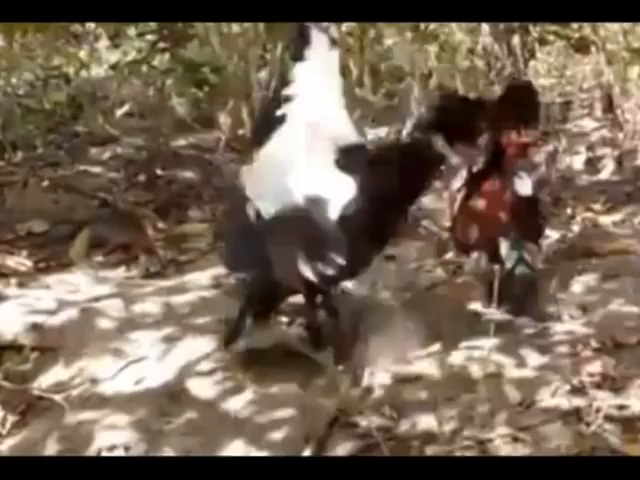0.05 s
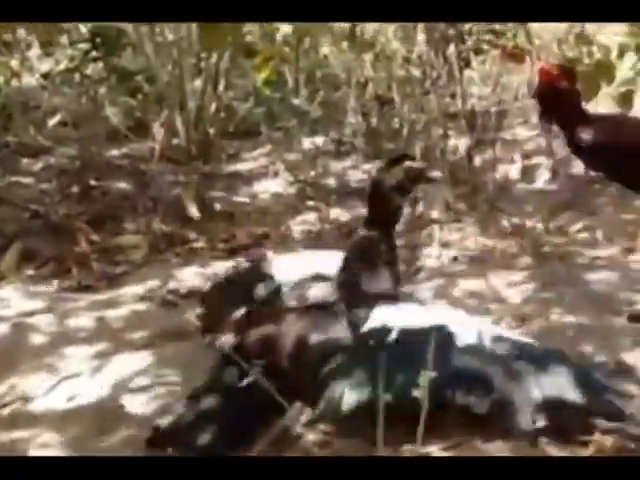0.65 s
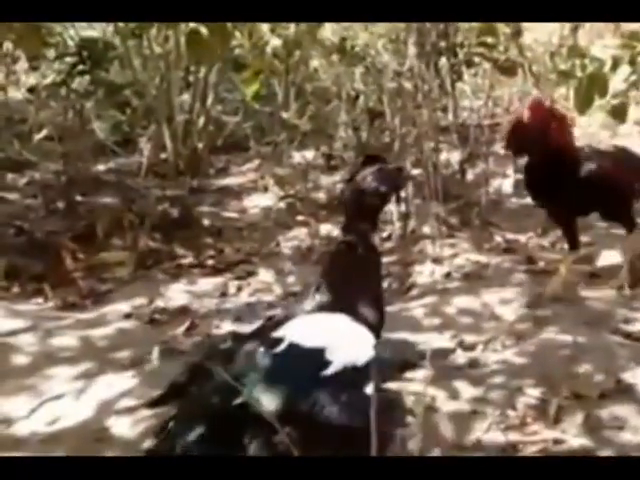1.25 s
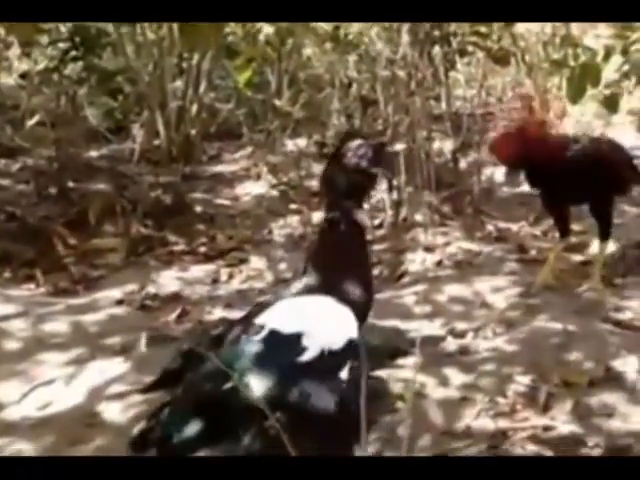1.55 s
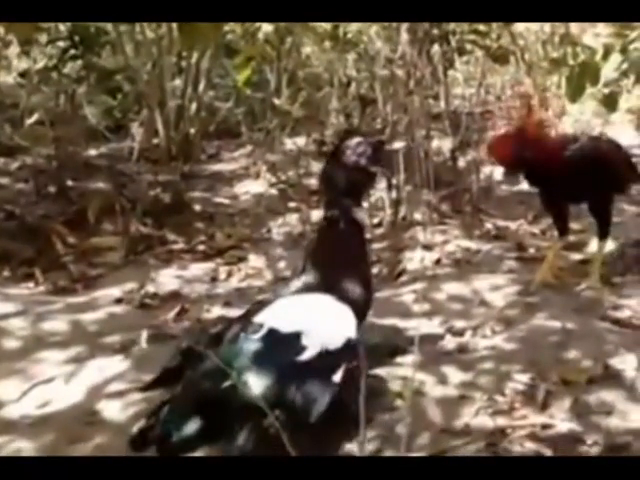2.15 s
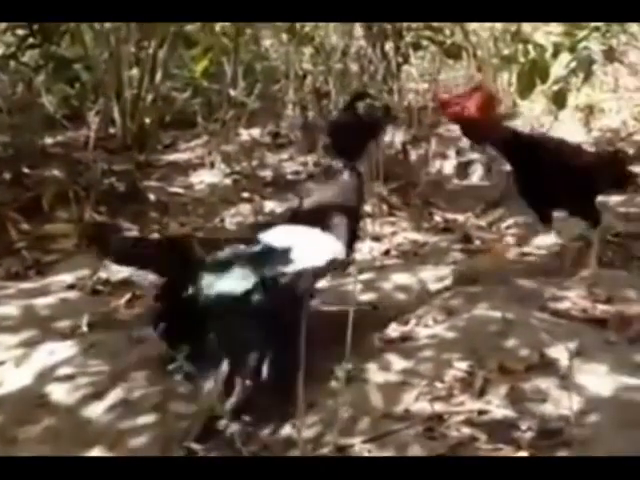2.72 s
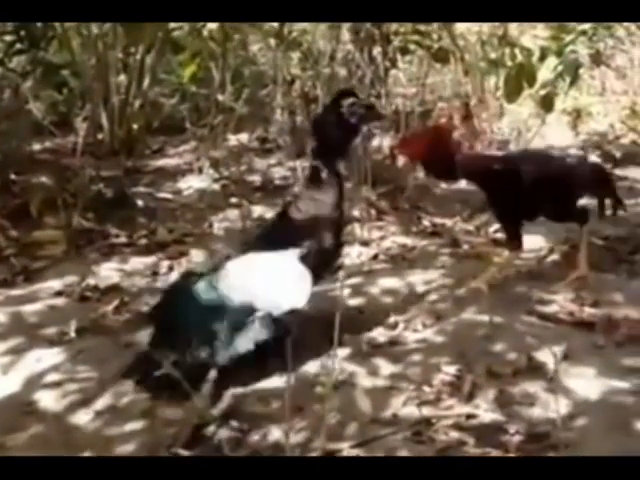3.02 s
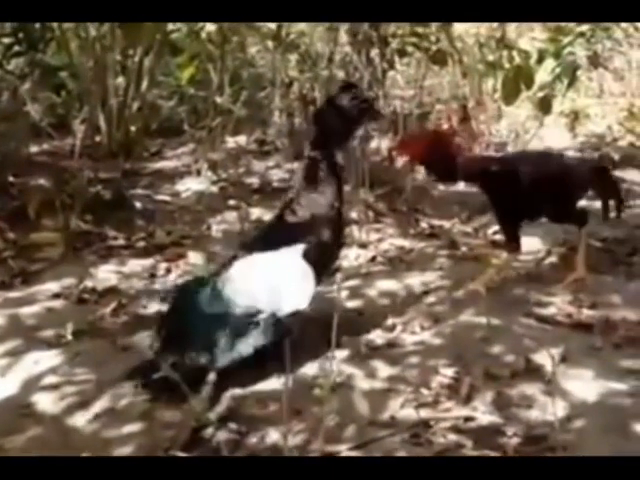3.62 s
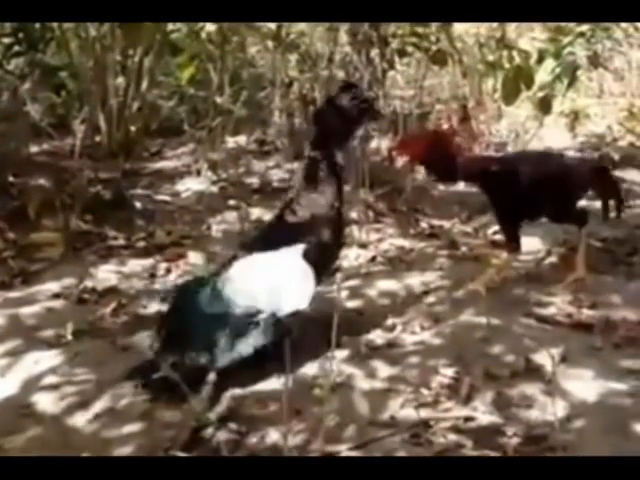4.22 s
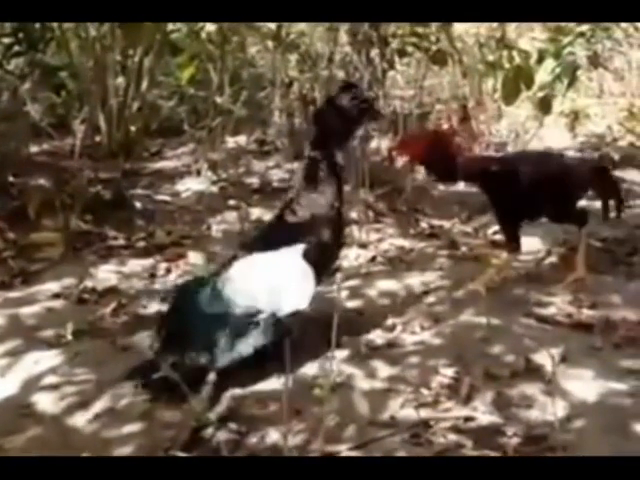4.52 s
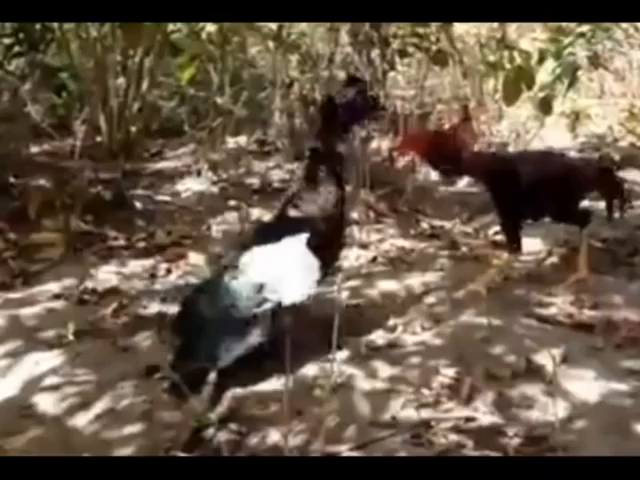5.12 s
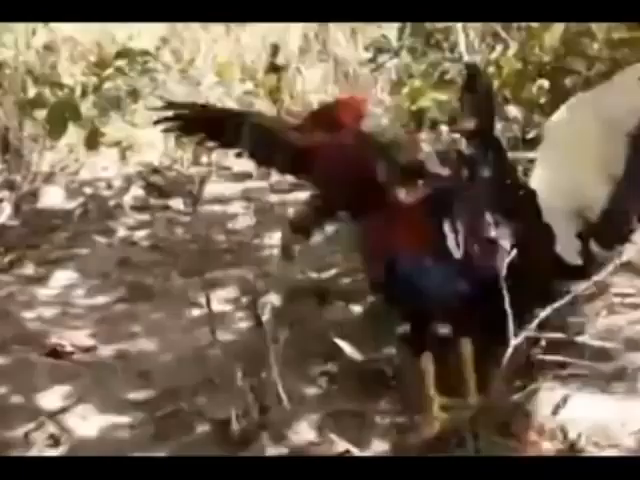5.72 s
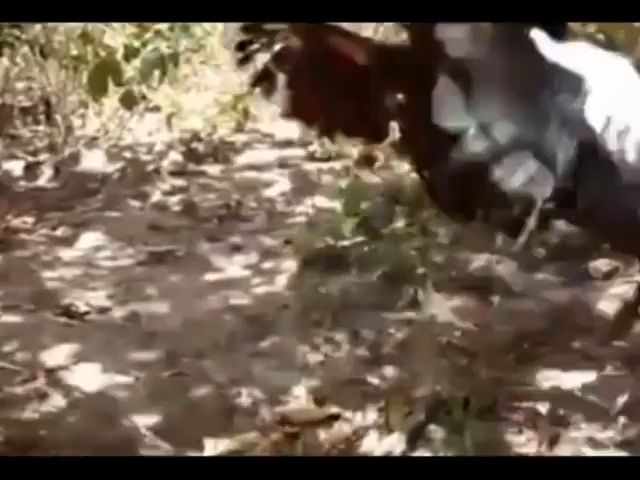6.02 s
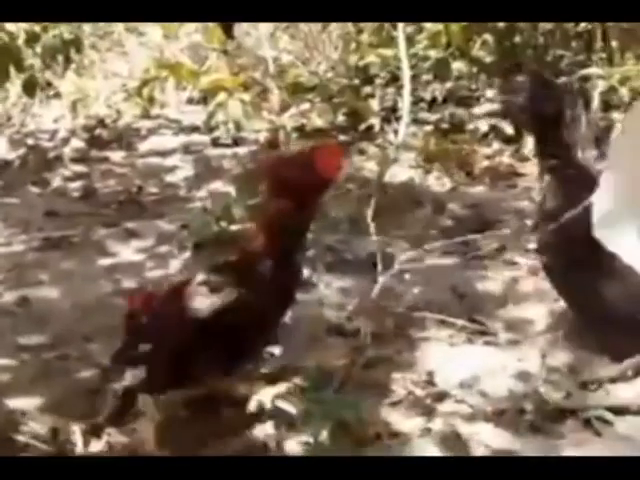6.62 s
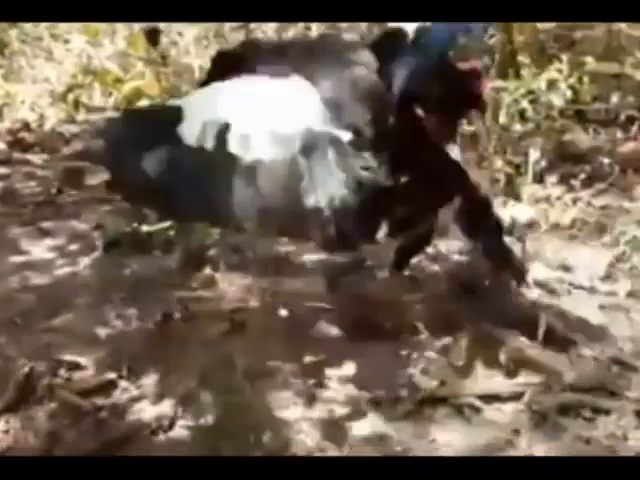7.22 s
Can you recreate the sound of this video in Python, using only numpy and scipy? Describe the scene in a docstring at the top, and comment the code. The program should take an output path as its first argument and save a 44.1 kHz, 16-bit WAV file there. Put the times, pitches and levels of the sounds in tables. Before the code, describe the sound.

A rooster and a duck fight on dry leaves under scrub, a few steps from a small microphone with gritty treble. In the first second wings swish and thump while feet crackle through leaf litter. Short hoarse clucks begin at about 0.7 seconds, roughly five a second. From 1 to 3 seconds they stand almost alone over faint outdoor air, with a few tiny twig ticks. At about 3.3 seconds the scuffle returns, louder: wings sweep and slap, feet churn leaves and scrape earth, and twigs snap. The strongest wing thump lands near 4.3 seconds and a sharp snap near 4.9, with clucks continuing between. From 5.6 to 6.2 seconds the clucking pauses for a quick run of hard wing slaps and another crack. Slightly duller clucks then resume amid rustling, with a low thump near 6.9 seconds and a last slap and snap around 7.3.

```python
"""On dry leaves under scrub, a rooster and ducks fight a few steps from a small microphone.
Wings swish, thump and slap, while feet churn the leaf litter and snap twigs.
Pulses of air ring a bird's throat in short hoarse clucks, about five a second,
clearest during a stand-off between the bouts. A cheap recorder makes the treble gritty."""
import sys
import numpy as np
from scipy import signal
from scipy.fft import rfft, irfft
from scipy.io import wavfile

SR = 44100
rng = np.random.default_rng(int(sys.argv[2]) if len(sys.argv) > 2 else 0)


def persist_wave(psi):
    """Save psi, clipped to +-1, as 16-bit WAV."""
    counts = np.round(np.clip(psi, -1, 1) * 32767).astype(np.int16)
    wavfile.write(sys.argv[1], SR, np.atleast_2d(counts).T)


N = 328986
TIME = np.arange(N) / SR

# Tone of crackling dry leaves: frequency_hz, level_db
LEAF_TONE = [(300, -15), (1200, -5.5), (2000, -3), (3400, -0.5), (5600, -16.5)]
# Dull tone of scraped earth and rushing air: frequency_hz, level_db
DULL_TONE = [(25, -27), (125, -10.5), (290, -5.5), (400, -7), (620, 1.5), (1200, -2.5), (2200, -14),
             (5000, -30.5)]
# Tone of a dry crack: frequency_hz, level_db
CRACK_TONE = [(300, -14), (1000, 1.5), (2300, 0), (3400, -5.5), (5200, -16)]


def amp(db):
    """Turns decibels into a gain to multiply by."""
    return 10 ** (np.asarray(db) / 20)


def unit(x):
    """Scales a signal to an average power of one."""
    return x / np.sqrt(np.mean(x ** 2) + 1e-20)


def add(mix, start_s, sound):
    """Mixes a sound in at the given time."""
    part = mix[max(0, round(start_s * SR)):][:len(sound)]
    part += sound[:len(part)]


def colour(x, tone, size=2048):
    """Filters a signal so that its lows and highs follow a tone table."""
    hz, db = np.transpose(tone)
    bin_hz = abs(np.fft.fftfreq(size, 1 / SR))
    log_gain = np.log(amp(np.interp(np.log(bin_hz + 1), np.log(hz), db)))
    taps = np.fft.ifft(np.exp(np.conj(signal.hilbert(log_gain)))).real  # rings only after a click
    return signal.oaconvolve(x, taps / np.linalg.norm(taps))[:len(x)]


def resonate(x, hz, width_hz):
    """Lets a signal ring around one pitch; a narrower band rings longer."""
    return signal.lfilter(*signal.iirpeak(min(hz, SR / 3), hz / width_hz, SR), x)


def wander(per_s):
    """A random curve that slides to a new value per_s times a second."""
    points = rng.standard_normal(int(N / SR * per_s) + 2)
    return unit(np.interp(TIME * per_s, np.arange(len(points)), points))


def grains(per_s, spread_db):
    """Random clicks, most of them tiny and a few large."""
    strength = amp(spread_db * np.minimum(rng.exponential(1, N), 4))
    return unit(strength * rng.choice([-1, 1], N) * (rng.random(N) < per_s / SR))


def crackle(per_s, spread_db, ring_db, ring_q=5, count=14):
    """Brittle clicks from leaves and quills that come and go, each ringing at its own pitch."""
    out = np.zeros(N)
    for hz in np.geomspace(1300, 3800, count):
        clicks = grains(per_s / count, spread_db) * amp(3.47 * wander(40))
        out += clicks + amp(ring_db) * unit(resonate(clicks, hz, hz / ring_q))
    return unit(out)


def crunches(per_s, decay_s, steady_db):
    """Loudness of things giving way one by one: sudden rises and quick fades over a steady part."""
    power = signal.lfilter([1], [1, -np.exp(-2 / (decay_s * SR))], grains(per_s, 0.96) ** 2)
    return unit(np.sqrt(power / power.mean() + amp(steady_db) ** 2))


def contacts(t, span_s, count=5):
    """A few sharp, uneven clicks in quick succession, the first the strongest."""
    order = np.arange(count)
    click_s = span_s * (order + rng.random(count) * (order > 0)) / count
    strength = rng.choice([-1, 1], count) * np.where(order > 0, rng.uniform(.3, .9, count), 1)
    return unit(strength @ np.sinc((t - click_s[:, None]) * SR / 2))


def scrub_echo(x, echo_db, fade_s, size=16384):
    """Stems and ground scatter a weak, short echo, which is added to the sound."""
    t = np.arange(size) / SR
    bounces = rng.standard_normal(size) * (rng.random(size) < 2000 / SR)
    echo = bounces * amp(-60 * t / fade_s) * (t > .002)
    return x + amp(echo_db) * signal.oaconvolve(x, echo / np.linalg.norm(echo))[:N]


def outdoor_air(wash_db=-59, drift_db=-2.23, stir_db=-67.5):
    """A soft outdoor wash of noise, with leaves stirring faintly."""
    # Tone of the wash: frequency_hz, level_db
    wash_tone = [(25, -3.5), (120, -8.5), (290, -4), (750, -2.5), (1400, -8.5), (3400, -15.5),
                 (5000, -28.5)]
    wash = unit(colour(rng.standard_normal(N), wash_tone)) * amp(wash_db + drift_db * wander(26))
    stir = grains(per_s=2500, spread_db=3) * amp(3 * wander(20))
    return wash + amp(stir_db) * unit(colour(stir, LEAF_TONE))


def shuffle_power(start_s, length_s, fade_db_per_s, push_s=0.0014):
    """Power of one shuffle: a quick push, a hold while the feet work, then settling."""
    t = TIME - start_s
    return (np.clip(t / push_s, 0, 1) * amp(-fade_db_per_s * np.maximum(t - length_s, 0))) ** 2


def leaf_litter(uncurl_db=-13.5, scrape_clump_db=7.5):
    """Feet crush leaves in clumps of crackle and scrape the earth below."""
    # Runs of steps through the litter: start_s, length_s, leaf_db, earth_db
    shuffles = [(0, 0.037, -46, -49.5), (0.118, 0.19, -51, -50.5), (0.312, 0.028, -44, -60),
                (0.395, 0.15, -48.5, -59.5), (0.54, 0.22, -49.5, -63.5), (0.79, 0.17, -52, -63),
                (1.007, 0.068, -53.5, -57.5), (3.046, 0.18, -58.5, -59.5), (3.291, 0.068, -51, -54),
                (3.392, 0.18, -69, -47.5), (3.606, 0.25, -45.5, -47), (3.88, 0.079, -39, -39),
                (3.97, 0.18, -45, -57), (4.238, 0.27, -44.5, -46.5), (4.55, 0.064, -44.5, -54.5),
                (4.749, 0.24, -49.5, -54.5), (4.963, 0.11, -43.5, -44), (5.177, 0.14, -46.5, -47.5),
                (5.631, 0.22, -45.5, -42), (5.919, 0.098, -45, -48.5), (6.065, 0.051, -49.5, -52),
                (6.136, 0.12, -45.5, -51), (6.444, 0.21, -53, -60.5), (6.699, 0.31, -49, -53),
                (6.88, 0.12, -44, -43.5), (7.11, 0.21, -48.5, -51), (7.32, 0.02, -41, -47)]
    leaf_power, earth_power = np.zeros((2, N))
    for start_s, length_s, leaf_db, earth_db in shuffles:
        earth_power += amp(earth_db) ** 2 * shuffle_power(start_s, length_s, fade_db_per_s=209)
        # Crushed leaves crackle on after the scrape, then spring back slowly and faintly.
        leaf_power += amp(leaf_db) ** 2 * shuffle_power(start_s, length_s, fade_db_per_s=141.5)
        leaf_power += amp(leaf_db + uncurl_db) ** 2 * shuffle_power(start_s, length_s, fade_db_per_s=22)
    crush = crunches(per_s=220, decay_s=0.023, steady_db=-0.5)
    brittle = crackle(per_s=2400, spread_db=3.3, ring_db=-2)
    leaves = unit(colour(brittle, LEAF_TONE) * crush)
    grit = colour(grains(per_s=4000, spread_db=2.3), DULL_TONE)
    earth = unit(grit * np.sqrt(crush) * amp(scrape_clump_db * np.tanh(wander(70))))
    return leaves * np.sqrt(leaf_power) + earth * np.sqrt(earth_power)


def twig_snaps(break_s=0.002163, splinter_s=.007, ring_q=1.4, crack_db=-2, splinter_db=-8, size=2048):
    """Wood fibres break one after another and make the twig ring briefly; splinters trail after."""
    # Twigs and dry stalks breaking underfoot: start_s, level_db
    snaps = [(0.123, -50), (0.368, -45), (0.644, -49), (0.745, -54), (.82, -50), (0.929, -50), (.973, -49),
             (1.027, -54), (1.454, -52.5), (1.698, -55.5), (2.418, -51.5), (2.8035, -51), (3.535, -33),
             (3.577, -40), (3.677, -44), (3.794, -49), (3.899, -37), (3.928, -44), (3.992, -42),
             (4.525, -41), (4.773, -45), (4.786, -44), (4.87, -32), (5.007, -49), (5.022, -51),
             (5.188, -47), (5.267, -47), (5.4758, -37.5), (5.644, -40), (6.133, -30.5), (6.732, -42.5),
             (6.954, -36), (7.007, -41), (7.3597, -38)]
    thickest_hz, rise_hz_per_db = 2170, 52  # the thickest twig snaps loudest and rings lowest
    loudest_db = max(db for _, db in snaps)
    out, t = np.zeros(N), (np.arange(size) - size / 2) / SR
    for start_s, db in snaps:
        hz = thickest_hz + rise_hz_per_db * (loudest_db - db)
        splinters = rng.standard_normal(size) ** 3 * (t > 0) * np.exp(-abs(t) / splinter_s)
        jolts = contacts(t, break_s) + amp(splinter_db) * unit(splinters)
        ring = resonate(resonate(jolts, hz, hz / ring_q), hz, hz)
        snap = unit(colour(ring, CRACK_TONE)) + amp(crack_db) * unit(colour(jolts, CRACK_TONE))
        add(out, start_s + t[0], amp(db) * unit(snap) * np.sqrt(.01 * SR / size))
    return out


def swishes():
    """Each stroke swells and fades: air rushes while quills and leaves rattle over one another."""
    # Sweeps of wings, and of feet through leaves: centre_s, half_length_s, air_db, hiss_db
    strokes = [(0.072, 0.012, -36, -62), (0.226, 0.0078, -38, -44.5), (0.253, .011, -42.5, -39.5),
               (0.285, 0.016, -45, -60), (0.392, 0.0089, -61, -34.5), (0.428, 0.016, -45, -41.5),
               (0.602, 0.023, -68, -45), (0.929, 0.012, -69, -45), (2.407, 0.0058, -73, -50),
               (2.593, 0.015, -76, -54.5), (3.301, 0.028, -41.5, -52.5), (3.55, 0.037, -35, -34),
               (3.757, 0.02, -39, -36), (3.952, 0.0089, -33, -42), (4.054, 0.013, -51, -37.5),
               (4.182, 0.03, -30.5, -31.5), (4.358, 0.015, -42, -40), (4.452, 0.0071, -43, -40),
               (6.019, 0.0069, -36, -47), (6.156, 0.023, -39.5, -40), (6.397, 0.017, -62, -43),
               (6.883, 0.0066, -50, -29.5)]
    air_gain, hiss_gain = np.zeros((2, N))
    for centre_s, half_length_s, air_db, hiss_db in strokes:
        swell = np.exp(-.7 * ((TIME - centre_s) / half_length_s) ** 2)
        air_gain += amp(air_db) * swell
        hiss_gain += amp(hiss_db) * swell
    air = unit(colour(rng.standard_normal(N), DULL_TONE))
    flutter = crunches(per_s=400, decay_s=0.0037, steady_db=-0.58)
    hiss = unit(colour(crackle(per_s=8000, spread_db=0.41, ring_db=-16.5), LEAF_TONE))
    return flutter * (air_gain * air + hiss_gain * hiss)


def thumps(cycles=2.36, swirl_db=-5, size=4096):
    """A few low, uneven waves, mostly of pushed air; the higher a thump, the shorter it is."""
    # Heavy wing beats and landings, and at 4.304 s the deep ring of a loud cluck: centre_s, level_db, pitch_hz
    beats = [(.066, -37, 227), (3.353, -44.5, 227), (3.409, -43, 182), (4.304, -21, 737), (6.921, -41, 220)]
    out, t = np.zeros(N), (np.arange(size) - size / 2) / SR
    for centre_s, db, hz in beats:
        swirl = unit(resonate(resonate(rng.standard_normal(size), hz, 2 * hz), hz, 2 * hz))
        push = unit(np.sin(2 * np.pi * hz * t)) + amp(swirl_db) * swirl
        add(out, centre_s + t[0], amp(db) * push * np.exp(-(t * hz / cycles) ** 2))
    return out


def slaps(ring_q=1.6, crack_db=-3.0, air_db=-6, size=2048):
    """Stiff feathers or toes land one after another: a short ring, a dry crack and a push of air."""
    # Blows of wings and feet: start_s, level_db, pitch_hz, contact_s
    blows = [(3.551, -29.5, 1150, 0.0051), (3.9525, -30, 1400, 0.0016), (4.197, -31, 2000, 0.00053),
             (4.41, -36, 890, 0.0012), (4.494, -39.5, 1100, 0.0021), (5.6696, -32.5, 1300, 0.0008),
             (5.7497, -25.5, 756, 0.0041), (5.767, -31, 1180, 0.0022), (5.812, -23, 880, 0.0045),
             (5.8855, -31, 1850, 0.0021), (5.937, -36.5, 1230, 0.0015), (5.99, -34.5, 1030, 0.0033),
             (6.1379, -28, 1720, 0.0026), (6.188, -30.5, 1000, 0.0044), (7.3264, -29, 1050, 0.0019)]
    out, t = np.zeros(N), (np.arange(size) - size / 2) / SR
    for start_s, db, hz, contact_s in blows:
        clicks = contacts(t, contact_s)
        ring = unit(resonate(resonate(clicks, hz, hz / ring_q), hz, hz))
        crack = amp(crack_db) * unit(colour(clicks, CRACK_TONE))
        air = amp(air_db) * unit(colour(clicks, DULL_TONE))
        add(out, start_s + t[0], amp(db) * unit(ring + crack + air) * np.sqrt(.01 * SR / size))
    return out


def throat(breath, rings, stretch):
    """The throat rings at several pitches, each multiplied by stretch, added with alternating signs."""
    out = 0
    for k, (hz, width_hz, db) in enumerate(rings):
        band = hz * stretch, np.sqrt(2) * width_hz
        out += (-1) ** k * amp(db) * resonate(resonate(breath, *band), *band)
    return out


def clucks(usual_s=.027, closing_db=4, hollow_db=-13, rough=0.54, size=4096, count=14):
    """Uneven pulses ring the throat. Easy calls hold their pitch; forced ones swell, rise and rasp."""
    # The bird's calls: start_s, pitch_hz, level_db
    calls = [(0.661, 264, -43.5), (0.85, 275, -43.5), (1.066, 264, -42), (1.339, 289, -39.5),
             (1.649, 268, -41.5), (1.85, 287.8, -38), (2.049, 290.7, -39), (2.276, 302, -38),
             (2.442, 290.5, -38.5), (2.682, 282.2, -42), (2.904, 271, -45), (3.184, 258.7, -39.5),
             (3.453, 263.3, -40.5), (3.748, 279, -37.5), (4.283, 286, -35), (4.449, 273.6, -40.5),
             (4.681, 279, -38.5), (4.882, 290, -36.5), (5.082, 263.4, -36.5), (5.287, 301.4, -37.5),
             (5.484, 288.4, -37.5), (6.241, 269, -42), (6.468, 293.7, -38.5), (6.669, 275, -38),
             (6.856, 275, -41), (7.079, 286, -40), (7.29, 297.2, -36)]
    # Lower and upper pitches at which the throat rings: pitch_hz, width_hz, level_db
    low_rings = [(270, 130, -5), (512, 170, 1), (774, 182, 9.5), (1158, 170, 10.5)]
    high_rings = [(1453, 560, -7), (1828, 390, 0.8)]
    # Upper rings against lower ones, duller once the fight resumes: time_s, level_db
    brightness = [(.66, -7.5), (3.2, -6.5), (4.9, -11.5), (7.3, -13.5)]
    dulling_db_per_hz = 0.24  # a cluck pitched above the usual is duller
    easy_db, glide_per_db, max_glide = -42, .07, .25  # louder calls glide up by a share of their pitch
    easy_start_db, forced_start_db, crest = -3, -9, .66  # the swell peaks this far through a call
    jitter, shimmer_db, stretch_spread = .03, 1.5, .06  # uneven timing, strength and throat shape
    out, t = np.zeros(N), np.arange(size) / SR
    _, usual_hz, usual_db = np.mean(calls, axis=0)
    for start_s, hz, db in calls:
        timing, strength, shape = rng.standard_normal((3, count))
        length_s = usual_s * amp((db - usual_db) / 4)  # stronger calls last longer
        progress = np.minimum(t / length_s, 1)
        glide = np.clip(glide_per_db * (db - easy_db), 0, max_glide)
        force = glide / max_glide

        pulse_s = (np.arange(count) + .2 + jitter * (1 + force) * timing) / hz
        pulse_s /= 1 + glide * (pulse_s / length_s - 1) / 2  # pulses crowd closer as the pitch rises
        share = pulse_s / length_s
        start_db = easy_start_db + force * (forced_start_db - easy_start_db)
        swell_db = start_db * np.maximum(1 - share / crest, (share - crest) / (1 - crest) / 2)
        push = amp(swell_db + shimmer_db * strength) * (pulse_s < length_s)
        pulses = push @ np.sinc((t - pulse_s[:, None]) * SR / 2)
        puffs = np.interp(t, pulse_s, push) * rng.standard_normal(size)
        breath = unit(pulses) + rough * (1 + force) * unit(puffs)

        stretch = 1 + stretch_spread * np.tanh(shape)  # the throat is never shaped twice alike
        tightened = stretch[0] * (1 + glide / 2)  # it rings higher as the pitch rises
        low = throat(breath * (1 - progress ** 2), low_rings, stretch[0])
        low += throat(breath * progress ** 2, low_rings, tightened)
        high_db = np.interp(start_s, *np.transpose(brightness)) - dulling_db_per_hz * (hz - usual_hz)
        # The call darkens as the bill shuts, and a nearly shut bill sounds hollow.
        high = throat(breath * amp(-closing_db * progress), high_rings, stretch[1])
        hollow = amp(hollow_db - high_db) * unit(resonate(low, 3 * hz, width_hz=200))
        voice = unit(unit(low) + hollow) + amp(high_db) * unit(high)
        add(out, start_s, amp(db) * unit(voice) * np.sqrt(length_s * SR / size))
    return out


def scene():
    """The birds under the scrub, in one channel."""
    voice = scrub_echo(clucks(), echo_db=-13.5, fade_s=0.32)
    scuffle = leaf_litter() + swishes() + slaps() + twig_snaps() + thumps()
    fight = scrub_echo(scuffle, echo_db=-11.5, fade_s=0.088)
    return (voice + fight + outdoor_air())[None]


def record(dry, top_hz=3800, hold_hz=8018, mirror_db=7, droop_hz=8200, edge_hz=10250):
    """A cheap recorder holds each of its slow samples, mirroring the sound into a gritty treble."""
    narrow = signal.sosfilt(signal.butter(10, top_hz, fs=SR, output="sos"), dry)
    hz = np.fft.rfftfreq(N, 1 / SR)
    mirror = amp(mirror_db) * rfft(narrow * np.cos(2 * np.pi * hold_hz * TIME)) * np.sinc(hz / hold_hz)
    held = irfft((rfft(dry) + mirror) / np.sqrt(1 + (hz / droop_hz) ** 20), N)
    treble_cut = signal.firwin(401, edge_hz, window=("kaiser", 8), fs=SR)
    return signal.oaconvolve(held, treble_cut[None], "same")


dry = scene()
out = record(dry)
persist_wave(out)
```